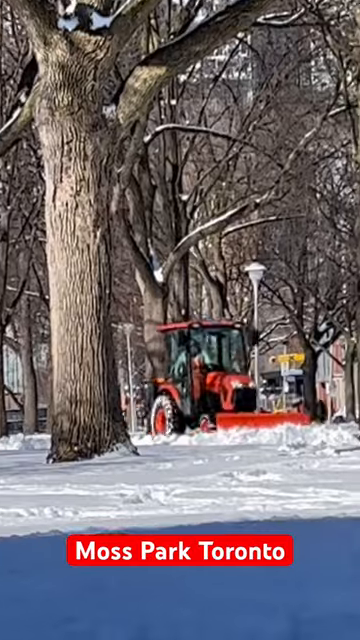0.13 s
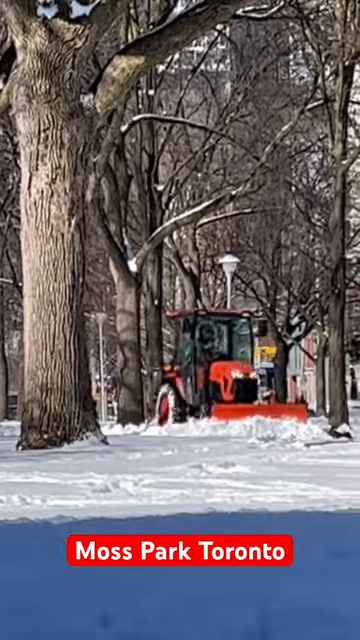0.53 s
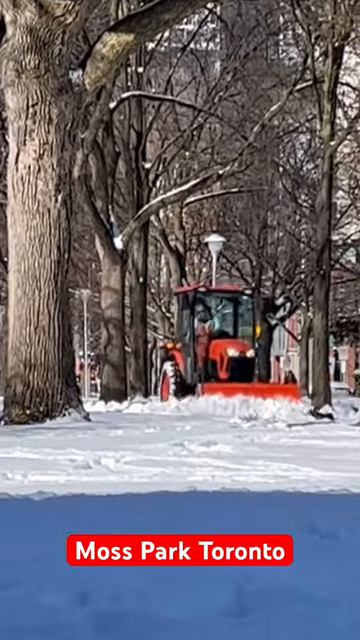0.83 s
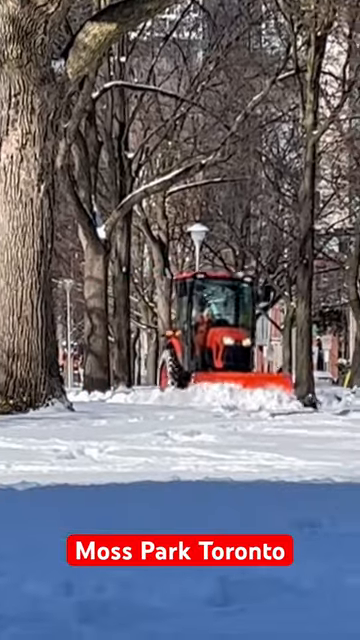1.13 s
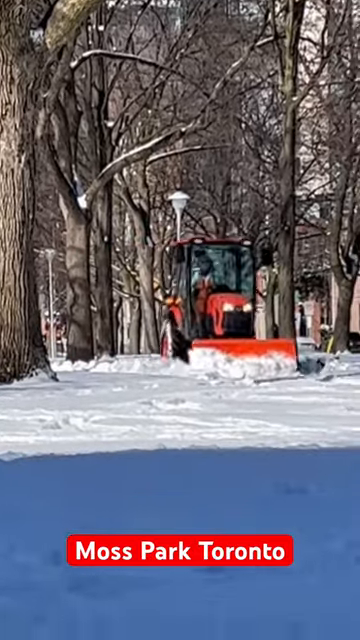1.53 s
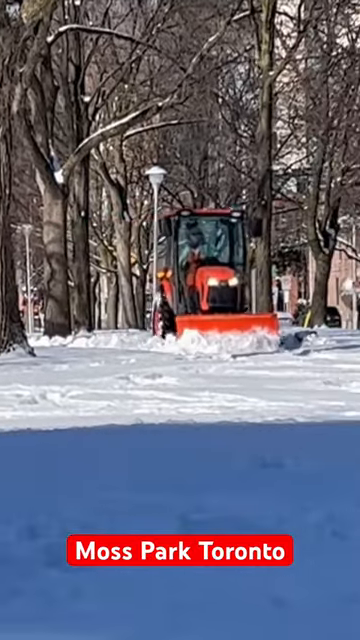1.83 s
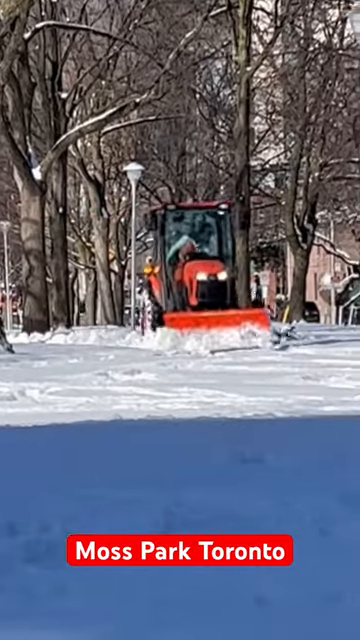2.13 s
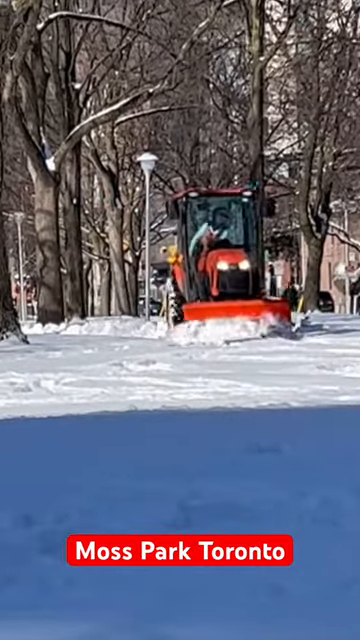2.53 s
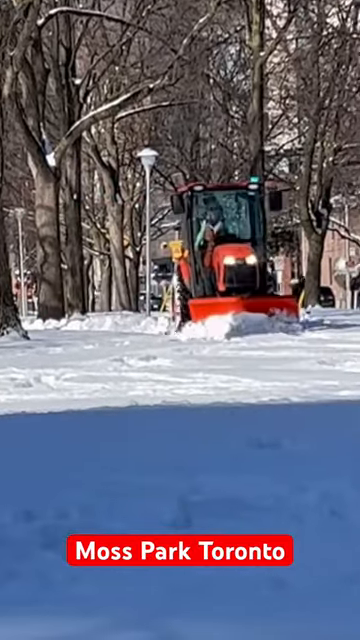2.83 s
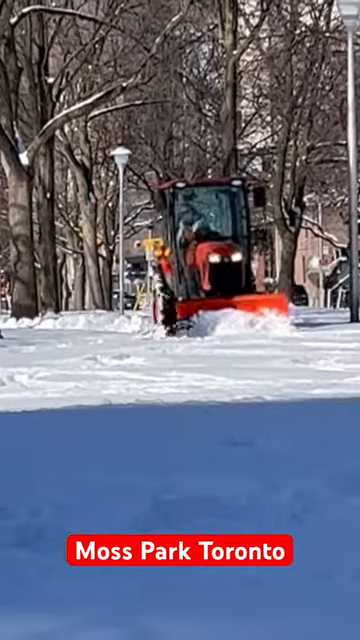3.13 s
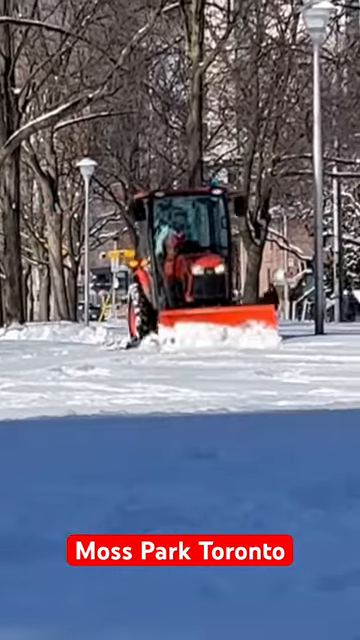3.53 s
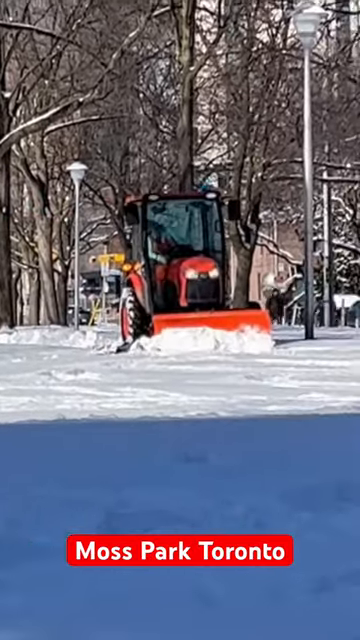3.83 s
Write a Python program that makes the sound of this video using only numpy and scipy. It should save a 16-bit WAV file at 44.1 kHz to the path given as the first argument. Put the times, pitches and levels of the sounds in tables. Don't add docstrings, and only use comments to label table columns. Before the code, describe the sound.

Gusty wind buffets the microphone, mild at first, then in hard puffs and slaps from the middle on; behind it a small diesel plough hums low and pushed snow roars faintly in an open park.

```python
import sys
import numpy as np
from scipy import signal
from scipy.fft import rfft, irfft, next_fast_len
from scipy.io import wavfile
from scipy.ndimage import uniform_filter1d, map_coordinates

SR = 44100
rng = np.random.default_rng(int(sys.argv[2]) if len(sys.argv) > 2 else 0)


def int16_out(signal):
    q = np.round(np.clip(np.atleast_2d(signal).T, -1, 1) * 32767)
    wavfile.write(sys.argv[1], SR, q.astype(np.int16))


def to_linear_factor(level_db):
    exponent = np.asarray(level_db, float) / 20
    return 10 ** exponent


N = 176400
T = np.arange(N) / SR
OPPOSED = np.array([[1], [-1]])

# t/s, low rumble level/dB, buffeting level/dB
WIND = [(0.0, -37.5, -43.5), (0.21, -41, -42), (0.32, -34, -44.5), (0.88, -32.5, -44.5), (1.07, -31, -46.5),
        (1.47, -21.5, -40), (1.54, -22.5, -31.5), (1.67, -38, -32), (1.92, -27.5, -37), (2.0, -25, -29),
        (2.05, -34.5, -37.5), (2.21, -35, -32.5), (2.45, -34, -38), (2.57, -25.5, -23.5), (2.88, -22, -25),
        (3.11, -33, -34.5), (3.12, -32, -33.5), (4.0, -33.5, -38)]
# t/s, firing rate f/Hz, level/dB
FIRING = [(0.0, 66.8, -40), (0.22, 59.33, -40), (0.54, 71.9, -35), (1.02, 72.2, -38.5), (1.09, 64, -31),
          (1.28, 64.3, -32), (1.38, 79.7, -32.5), (1.84, 70.4, -38), (1.9, 79.9, -32), (2.14, 65.85, -40),
          (2.55, 87.26, -37), (2.8, 74.6, -31.5), (3.48, 62.9, -39), (3.74, 86.35, -39), (3.85, 73, -40),
          (4.0, 83.7, -42.5)]


def unit(x):
    return x / np.sqrt(np.mean(x ** 2) + 1e-20)


def along(points, hz):
    f, v = np.transpose(points)
    return np.interp(np.log(hz + 1), np.log(f + 1), v)


def colour(points):
    def gain(hz):
        above_floor = hz >= points[0][0] / 2
        return to_linear_factor(along(points, hz)) * above_floor / (1 + (hz / points[-1][0]) ** 10)
    return gain


def curves(rows):
    s, *cols = np.transpose(rows)
    return [np.interp(T, s, c) for c in cols]


def wobble(rate):
    return map_coordinates(rng.standard_normal(1000), [T * rate])


def filtered(x, response):
    m = next_fast_len(N + 8192)
    return irfft(rfft(x, m) * response(np.fft.rfftfreq(m, 1 / SR)), m)[..., :N]


def mean_power(x, hold_s):
    width = int(hold_s * SR)
    return np.abs(uniform_filter1d(uniform_filter1d((x ** 2).mean(axis=0), width), width))


def rush(alike, patchy_db):
    z = signal.stft(rng.standard_normal((2, N + 512)), nperseg=512)[2]
    field = uniform_filter1d(rng.standard_normal(z.shape[1:]), size=6, axis=0)
    field = uniform_filter1d(field, size=12, axis=1)
    pair = signal.istft(z * to_linear_factor(patchy_db * unit(field)), nperseg=512)[1][:, :N]

    def shares(hz):
        turn = np.arccos(np.clip(along(alike, hz), -1, 1)) / 2
        return np.array([np.cos(turn), np.sin(turn)])

    mid, side = filtered(pair, shares)
    return np.array([mid + side, mid - side])


def gusting(spectrum, even, hold_s):
    # f/Hz, coherence [0-1]
    wind_alike = [(50, 1), (150, 0.92), (400, 0.93), (900, 0.66)]
    # f/Hz, left over right level/dB
    wind_left = [(200, -0.5), (450, 1.5), (800, 4.5)]

    def lean(hz):
        return colour(spectrum)(hz) * to_linear_factor(along(wind_left, hz) * OPPOSED / 2)

    x = unit(filtered(rush(wind_alike, patchy_db=1.1), lean))
    return unit(x / (mean_power(x, hold_s) + 0.056) ** (even / 2))


def wind():
    # centre t/s, level/dB, brightness level/dB, width t/s
    puff_events = [(1.514, -43, -18, 0.023), (1.568, -32, -11, 0.02), (1.626, -31.5, -14, 0.021),
                   (1.683, -34, -14, 0.05), (1.825, -33, -13, 0.024), (1.883, -35.5, -28, 0.054),
                   (1.966, -42.5, -10, 0.025), (2.008, -33.5, -11.5, 0.016), (2.18, -41, -15, 0.064),
                   (2.263, -29.5, -10.5, 0.016), (2.365, -36.5, -3, 0.015), (2.412, -39, -5, 0.018),
                   (2.484, -32, -14, 0.0093), (2.535, -31.5, -7, 0.015), (2.585, -30, -7.5, 0.019),
                   (2.691, -26.5, -2.5, 0.05), (2.755, -27, -0.5, 0.024), (2.831, -38.5, 2, .021),
                   (2.896, -27.5, -2, 0.054), (3.007, -35, -2.5, 0.031), (3.14, -35.5, -17, 0.03),
                   (3.245, -33.5, -9, 0.11), (3.301, -36.5, -6.5, 0.022), (3.4, -40, -3.5, 0.04),
                   (3.492, -32, -9, 0.032), (3.57, -35.5, -11, 0.039), (3.682, -32.5, -16, 0.027),
                   (3.76, -36.5, -15, 0.03), (3.869, -44, -8, 0.01), (3.98, -41, -9, .03)]
    # f/Hz, level/dB
    buffet = [(40, -23), (90, -0.5), (140, 3), (250, -5.5), (400, -10.5), (550, -19.5), (800, -59)]
    puff_body = [(60, -4), (150, -4), (300, -6), (450, -12), (600, -19), (850, -54)]
    puff_edge = [(250, -44), (450, -1.5), (650, -2), (850, -9), (1050, -16), (1400, -46)]
    thump = [(12, -6), (30, 0), (100, -9), (200, -1), (350, -25)]

    low_db, buffet_db = curves(WIND)
    s, peak_db, bright_db, width = np.transpose(puff_events)[:, :, None]
    shape = np.exp(-np.log(16) * ((T[::32] - s) / (1.37 * width)) ** 2)

    def envelope(db):
        power = (to_linear_factor(2 * db) * shape).sum(axis=0)
        return np.repeat(np.sqrt(power), 32)[:N]

    body = envelope(peak_db - 0.5)
    edge = envelope(peak_db + bright_db - 4)

    slow, fast = wobble(21.49), wobble(95)
    steady = to_linear_factor(buffet_db - 4.0 + 0.83 * slow + 1.7 * fast) * gusting(buffet, 0.6, 0.018)
    puffs = body * to_linear_factor(1.7 * fast) * gusting(puff_body, 0.99, 0.0093)
    puffs = puffs + edge * to_linear_factor(3.5 * fast) * gusting(puff_edge, 0.32, 0.015)

    pressure = filtered(rng.standard_normal(N), colour(thump))
    thumps = unit(to_linear_factor(5.0 * wobble(30.13)) * pressure)
    thump_gain = to_linear_factor(0.86 * low_db + 0.078 * buffet_db - 21)
    return steady + puffs + thump_gain * thumps * OPPOSED


def slaps():
    # centre t/s, peak level/dB, pitch f/Hz
    eddies = [(1.289, -33, 209), (1.378, -29, 202.7), (1.524, -19.5, 230.0), (1.537, -23, 208),
              (1.551, -17.5, 209), (1.569, -18, 255), (1.615, -20, 250.6), (1.636, -23, 322),
              (1.685, -26, 267.7), (1.719, -39, 249), (1.824, -26, 300.0), (1.965, -22, 272),
              (1.981, -26, 238.2), (2.008, -20.5, 330.0), (2.165, -26, 297.5), (2.22, -18, 230.0),
              (2.265, -21.5, 340.0), (2.283, -34, 241), (2.408, -26, 236), (2.481, -25, 262.6),
              (2.529, -17, 230.0), (2.583, -18, 240.0), (2.658, -24, 300.0), (2.697, -11, 393),
              (2.719, -19, 351), (2.752, -26, 426), (2.781, -15, 260.0), (2.853, -24, 230.0),
              (2.875, -17, 276.5), (2.894, -10, 470.0), (2.916, -15, 310.0), (3.007, -28, 280.0),
              (3.072, -25, 260.0), (3.13, -33, 222.5), (3.146, -22, 219.7), (3.173, -25, 269),
              (3.244, -15.5, 281.6), (3.269, -23, 301.4), (3.318, -31, 238.5), (3.403, -24, 310.0),
              (3.49, -17.5, 392), (3.57, -18, 250.0), (3.685, -20.5, 297), (3.756, -23, 310.0),
              (3.79, -23, 217.7), (3.855, -24, 208), (3.868, -24.5, 230.0), (3.978, -27, 274)]
    cycles, gain_db, side = 0.4, -1, 0.2

    out = np.zeros((2, N + SR))
    t = np.arange(-800, 800) / SR
    chances = rng.uniform(-0.92, 1, (len(eddies), 2))
    for (s, peak_db, pitch_hz), (turn, lean) in zip(eddies, chances):
        bell = np.exp(-(t * pitch_hz / cycles) ** 2)
        wave = bell * np.cos(2 * np.pi * pitch_hz * t + np.pi * turn)
        start = round(s * SR + t[0] * SR)
        out[:, start:start + len(t)] += to_linear_factor(peak_db + gain_db) * wave * (1 + side * lean * OPPOSED)
    return out[:, :N]


def surges():
    # centre t/s, boost level/dB
    surge_events = [(0.102, 3), (0.248, 7), (0.35, 7), (0.45, 5), (0.647, 2.5), (0.698, 4), (0.754, 1.5),
                    (0.837, 4.5), (1.01, 4.5), (1.176, 4), (1.277, 7.5), (1.371, 6.5), (1.487, 6.5),
                    (1.545, 5.5), (1.628, 8.5), (1.827, 10.5), (1.93, 5), (2.12, 8), (2.195, 6.5),
                    (2.354, 11), (2.561, 6), (2.642, 3), (2.68, 9.5), (2.823, 8), (2.886, 3.5), (2.966, 7),
                    (3.006, 6), (3.134, 9.5), (3.294, 10.5), (3.366, 3.5), (3.411, 10), (3.536, 5.5),
                    (3.574, 9.0), (3.635, 8.0), (3.75, 8.5), (3.829, 5)]
    length_s, between_db = 0.021, -4

    s, boost_db = np.transpose(surge_events)[:, :, None]
    bells = np.exp(-((T - s) / length_s) ** 2)
    return to_linear_factor(between_db) * (1 + ((to_linear_factor(boost_db) - 1) * bells).sum(axis=0))


def firing():
    orders_db = [2.5, -17, -18]

    rate_hz = curves(FIRING)[0] * (1 + 0.045 * wobble(12))
    phase = 2 * np.pi * np.cumsum(rate_hz) / SR
    return sum(to_linear_factor(db + 1.2 * wobble(25)) * np.sin(k * phase) for k, db in enumerate(orders_db, 1))


def low_bed():
    # f/Hz, level/dB
    rumble_colour = [(12, -31), (30, -9.5), (50, 1.5), (72, 3), (100, -3), (150, -13.5), (250, -21.5),
                     (400, -45)]
    steadiness = 0.95

    rumble = to_linear_factor(curves(WIND)[0] - 3)
    hum = to_linear_factor(curves(FIRING)[1] + 2.1)
    x = rumble * gusting(rumble_colour, 0.87, 0.02) + hum * firing()
    excess = mean_power(x, hold_s=0.032) / (rumble ** 2 + hum ** 2 / 2)
    return surges() * x / (excess + 0.059) ** (steadiness / 2)


def strain():
    t = T - 1.1
    length_s, start_hz, rise_hz_per_s = 0.1, 230, 199.6
    pitch = (start_hz + rise_hz_per_s * t) * (1 + 0.027 * wobble(30.2))
    return to_linear_factor(-43.5) * np.exp(-(t / length_s) ** 2) * np.sin(2 * np.pi * np.cumsum(pitch) / SR)


def roar():
    # t/s, loudness level/dB, brightness level/dB
    course = [(0.0, -54, 8.5), (0.15, -50.5, 4), (0.3, -51, 4.5), (0.85, -48.5, 3.5), (1.2, -44, 3),
              (1.48, -48, 5.5), (1.68, -44.5, -0.5), (1.74, -47, 2.5), (2.08, -47.5, 4.5),
              (2.26, -50.5, 7.5), (2.54, -46, 2), (2.94, -47, 1), (3.1, -45, 4), (3.22, -48, 11),
              (3.34, -51, 7.5), (3.55, -48, 2), (3.74, -55, 8.5), (4.0, -57.5, 8)]
    # f/Hz, level/dB
    roar_colour = [(80, 3), (250, 1), (600, -0.5), (1400, 0.5), (3000, -2.5), (6000, -11), (12500, -21.5),
                   (15600, -22.5)]
    # f/Hz, coherence [0-1]
    roar_alike = [(100, 1), (350, 0.28), (600, 0.08), (1000, 0.4), (1500, 0.87), (2400, 1), (4500, 0.95),
                  (7000, 0.78)]
    # f/Hz, level/dB
    right_gain = [(450, 2), (900, 2.5), (1200, 5), (1450, 11.5), (1800, 11.5), (2000, 7.5), (2400, 0.5),
                  (3500, 0.5)]
    # f/Hz, phase/rad
    right_turn = [(500, 7), (780, 3.5), (1610, 3.5), (1660, 1.12), (2100, 0.23), (3100, 0.8), (3700, 0)]
    high_turn = [(5150, 0), (7000, 1.5), (8400, 3.1), (10000, 4.7), (11300, 6.3), (13200, 6.6),
                 (14100, 7.8), (14800, 9.4)]

    def ports(hz):
        turn = along(right_turn, hz) + along(high_turn, hz)
        right = to_linear_factor(along(right_gain, hz)) * np.exp(1j * turn)
        return colour(roar_colour)(hz) * np.array([np.ones_like(hz), right])

    x = filtered(rush(roar_alike, patchy_db=-0.58), ports)
    dull = filtered(x, lambda hz: 1 / (1 + (hz / 2300) ** 4))
    top = filtered(x, lambda hz: 1 - 1 / (1 + (hz / 6500) ** 4))
    middle = x - dull - top

    level_db, bright_db = curves(course)
    swing_db = level_db - level_db.mean()
    body_db = swing_db + bright_db - bright_db.mean()
    mix = dull * to_linear_factor(body_db + 0.4 * wobble(9.14))
    mix = mix + middle * to_linear_factor(swing_db + 0.42 * wobble(12))
    mix = mix + top * to_linear_factor(1.48 * swing_db + 0.45 * wobble(10))
    return to_linear_factor(level_db.mean() + 10) / x.std() * mix


def scene():
    return wind() + slaps() + low_bed() + strain() + roar()


def kept(x, gaps):
    hz, t, z = signal.stft(x, SR, nperseg=1024)
    for a, b, *wander in gaps:
        drift = uniform_filter1d(rng.standard_normal((2, len(t))), size=5, axis=1)
        low, high = np.round(1.6 * drift) * np.c_[wander]
        z = z * ((hz[:, None] < a + low) | (hz[:, None] > b + high))
    return signal.istft(z, SR, nperseg=1024)[1][:N]


def band_limit(x):
    return signal.sosfilt(signal.butter(12, 15760, fs=SR, output="sos"), x)


def record(dry):
    # lower edge f/Hz, upper edge f/Hz, wander of each edge f/Hz
    sum_gaps = [(7900, 9000, 200, 130), (14350, 17000, 200, 0)]
    difference_gaps = [(2400, 2400, 300, 300), (3250, 5280, 450, 130), (10900, 13150, 250, 330),
                       (14200, 14200, 300, 300)]

    ceiling = 0.26
    left, right = dry / (1 + np.abs(dry / ceiling) ** 4) ** (1 / 4)
    mid = kept((left + right) / 2, sum_gaps)
    side = kept((left - right) / 2, difference_gaps)
    return band_limit(np.array([mid + side, mid - side]))


dry = scene()
out = record(dry)
int16_out(out)
```